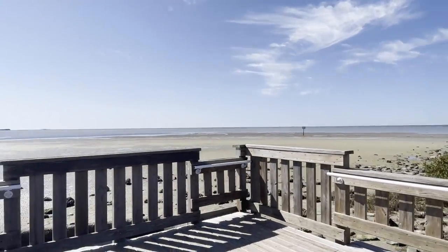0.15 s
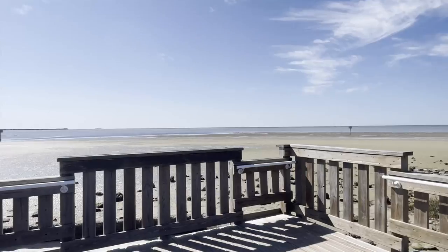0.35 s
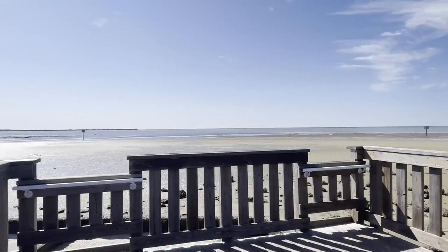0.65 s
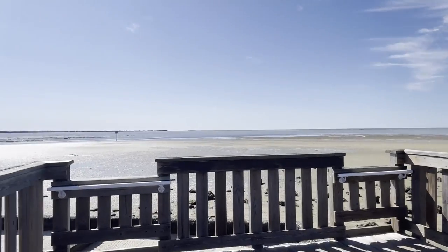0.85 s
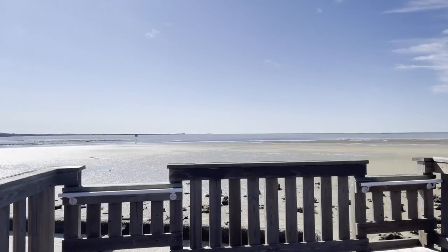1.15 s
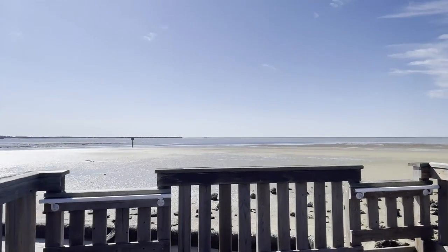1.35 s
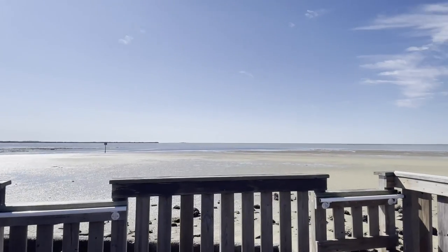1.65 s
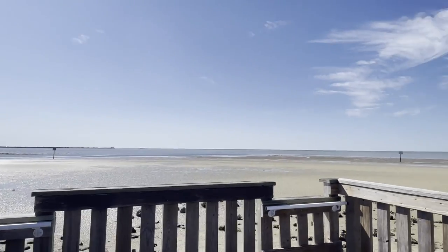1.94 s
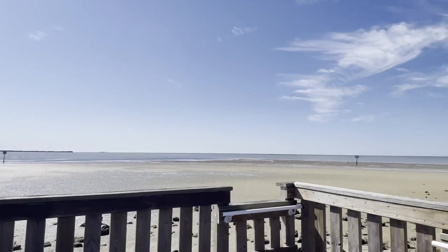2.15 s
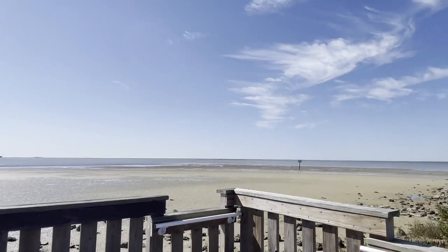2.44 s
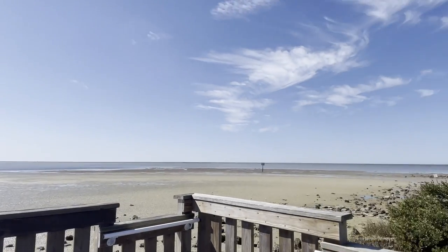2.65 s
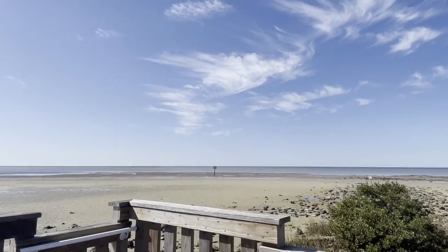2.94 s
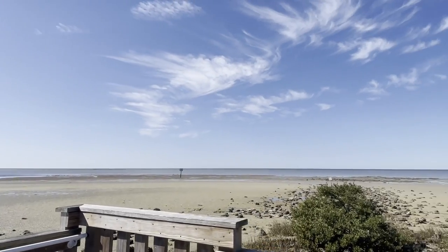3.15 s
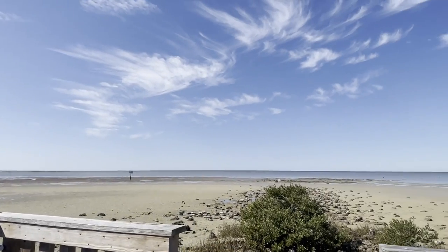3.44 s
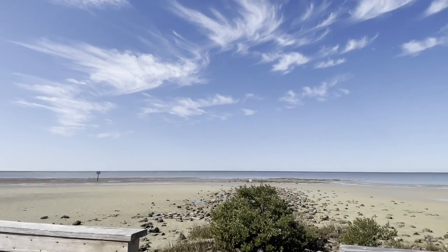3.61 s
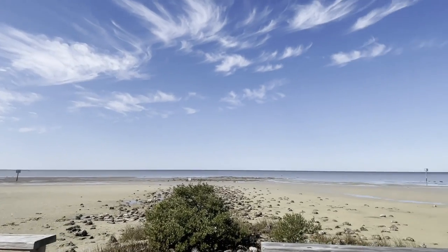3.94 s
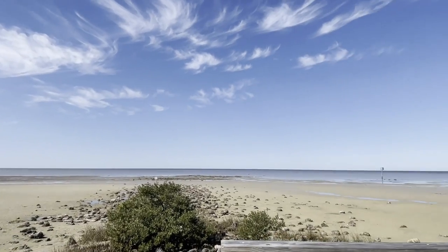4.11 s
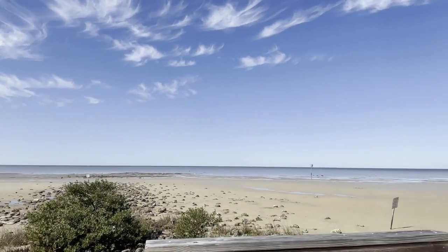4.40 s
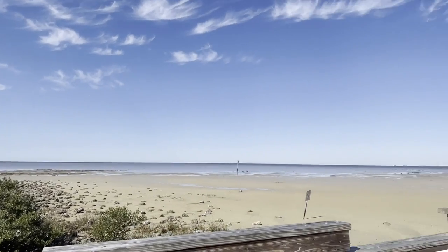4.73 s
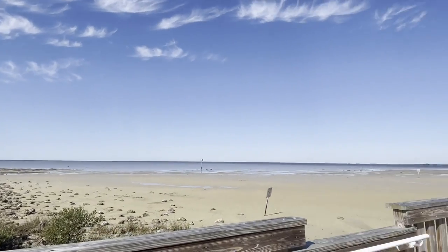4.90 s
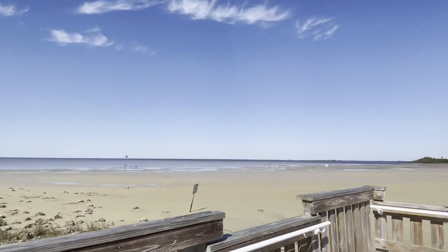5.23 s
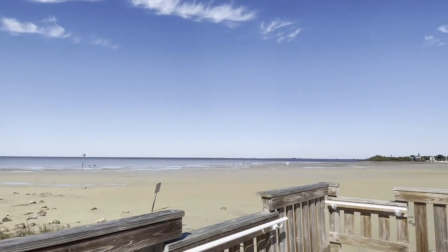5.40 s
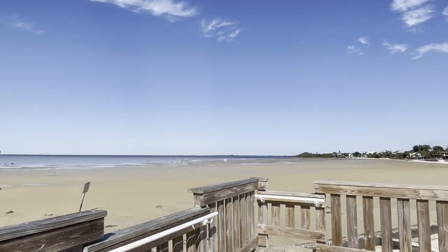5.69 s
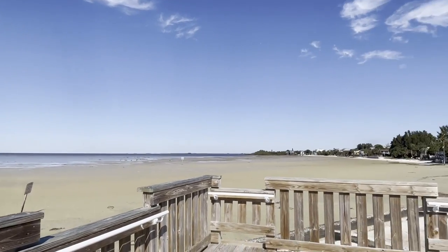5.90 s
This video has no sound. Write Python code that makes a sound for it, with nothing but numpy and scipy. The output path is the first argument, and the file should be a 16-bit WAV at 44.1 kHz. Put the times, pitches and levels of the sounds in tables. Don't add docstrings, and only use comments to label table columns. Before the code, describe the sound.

A quiet outdoor take on a wooden deck by a beach, heard only in the left channel. From 0 s low wind rumbles and flutters on the microphone, strongest until about 1.9 s, with a crackle at once and a finger tick at 0.14 s. A very faint step comes near 0.55 s, then clear hollow knocks at 1.6, 2.1, 2.5, 3.0, 3.5 and 3.9 s, each briefly ringing in the boards. Steps continue about every 0.45 s, weaker, to 5.7 s. A sharp chip sounds at 1.15 s; short falling bird whistles come at 1.8, 2.8, 3.7, 4.6 and 5.7 s, lightly echoed, with barely audible coos. Ticks cluster near 1.5 and 2.5 s. Faint shore wash and a slight insect shimmer lie behind. Wind drops after 3.7 s; dry crackles gather at 5.1-5.5 s, and a soft gust begins at 6 s.

```python
import sys
import numpy as np
from scipy import signal
from scipy.fft import next_fast_len
from scipy.io import wavfile
from scipy.ndimage import uniform_filter1d

SR = 44100
rng = np.random.default_rng(int(sys.argv[2]) if len(sys.argv) > 2 else 0)


def transcribe(signal):
    frames = np.atleast_2d(signal).T
    limited = np.clip(frames, -1, 1)
    pcm = np.round(limited * 32767).astype(np.int16)
    wavfile.write(sys.argv[1], SR, pcm)


def boost(x):
    u = np.asarray(x, float) / 20
    return 10 ** u


N = 267113

# (time [s], weight on the deck [dB], hollow boom above it [dB], plank ring above it [dB])
STEPS = [(.556, -87, -9, 2), (1.585, -65, 0.5, 2), (2.064, -62.5, 0.5, 5.5), (2.54, -66, 3, 0.5),
         (3.024, -67.5, 0.5, 9), (3.488, -64, 1, -2.5), (3.925, -75, 6.5, 4), (4.364, -73.5, 3, 5),
         (4.79, -84.5, 1.5, 1), (5.234, -80, -14, -7), (5.689, -78.5, -0.5, -6)]
# (strike [dB], hardness [dB per band], loose board clack [dB])
SOLES = [(-78.5, 4, -6), (-62, -4.5, -0.5), (-58.5, -3.5, -5.5), (-59.5, -7, -3), (-63.5, -2, 1.5),
         (-59.5, -1, 2.5), (-62.5, -.5, -10), (-68.5, 2, 1.5), (-78, -0.5, 10.5), (-80.5, 4, 11.5),
         (-67.5, -1, -14)]
# (pitch [Hz], level [dB], arrives after [s], builds in [s], t60 [s])
JOIST_MODES = [(124.6, -1.5, 0.0043, 0.0042, 0.53), (181.4, 4.5, 0.013, 0.013, 0.3),
               (207.3, -8, 0.0057, 0.021, 0.94)]
BOOM_MODES = [(184, 1.86, 0.1, 0.068, 0.73)]
BOARD_MODES = [(323, 2, 0.0067, .015, 0.37), (340, -5, 0, 0.04, 0.46), (349.6, -4, 0.022, .04, 1),
               (390.3, 0, 0, 0.042, 1)]
PLANK_MODES = [(475, -14.5, 0, 0.022, 0.98), (595.4, -10, 0, 0.011, 0.51), (620, -10, 0, 0.0073, 0.84),
               (632, -4.5, 0.054, 0.012, .45)]
# (pitch [Hz], width [Hz], level [dB])
KNOCK_RING = [(736, 36, -5), (917.5, 37, 0), (528, 97, -5.5), (900, 750, 6)]
CLACK_RING = [(1114, 46, -1.5), (1190, 11, -15), (1261, 100, 1.5), (1240, 790, 0.5)]
CLAP_RING = [(1575, 25, -6), (1714, 72, -6), (1890, 44, -10.5), (1880, 810, 6.5)]
SLAP_RING = [(3295, 290, 0.5), (3600, 420, 4.5), (3900, 220, -8)]

# (time [s], level [dB], top [Hz], end [Hz], sag [1 straight, more = early])
WHISTLES = [
    (1.812, -73.5, 4060, 3340, 1.4),
    (2.759, -67.5, 4100, 3330, 3.2),
    (3.739, -63.5, 3915, 3106, 1.63),
    (4.56, -65, 3880, 3200, 3.8),
    (5.745, -67, 3803, 3394, 2.6),
]
# (time [s], level [dB], top [Hz], end [Hz], sag [1 straight, more = early])
COOS = [
    (.15, -74.5, 742, 753, 1),
    (1.37, -81.5, 760, 698, 0.69),
    (5.59, -78, 750, 742, 1),
]
# (time [s], level [dB], start [Hz], end [Hz], length [s])
CHIPS = [
    (1.15, -56.5, 4100, 1490, 0.0078),
    (1.152, -60, 3900, 2500, 0.015),
    (1.164, -66, 3660, 2940, 0.0066),
    (5.847, -69, 3400, 3020, 0.016),
]

# (time [s], peak [dB], ring [Hz], overtone [dB], thud [dB])
TICKS = [(0.142, -47.5, 2950, -84, -50.5), (0.8714, -56, 3180, -64, -63), (1.3584, -59.5, 3680, -59.5, -91),
         (1.5357, -49.5, 4380, -49, -98), (1.548, -56, 4100, -78, -85), (2.5243, -62, 3520, -77, -83),
         (2.5418, -55.5, 3700, -62, -82), (2.5543, -52.5, 3900, -56, -55), (2.7128, -76, 4300, -79, -85),
         (4.1527, -57.5, 4270, -66, -83), (4.242, -70, 2920, -85, -90), (4.255, -75, 2600, -90, -85)]
# (time [s], peak [dB], ring [Hz])
CRACKLES = [(0.028, -45, 4160), (0.028, -60, 6200), (0.555, -56.5, 5570), (0.855, -57, 6160),
            (1.521, -53, 5860), (2.5794, -62, 5590), (3.4261, -57.5, 5600), (3.5304, -61, 6370),
            (3.5576, -59, 5850), (4.0953, -55.5, 6790), (4.1627, -54, 6060), (4.473, -58, 6200),
            (5.104, -61, 6320), (5.1262, -65, 6450), (5.1644, -69, 5910), (5.1911, -59.5, 5900),
            (5.262, -58, 6200), (5.2944, -61, 7010), (5.3048, -54.5, 6240), (5.3194, -57, 6300),
            (5.3358, -55, 6650), (5.365, -58, 6250), (5.3806, -53, 6200), (5.5004, -63.5, 6040)]

# (time [s], pressure [dB])
WIND = [(.04, -27.5), (.25, -41), (.45, -41.5), (.7, -27.5), (.96, -33.5), (1.15, -31), (1.38, -22.5),
        (1.6, -30.5), (1.84, -29), (1.97, -38), (2.1, -33), (2.6, -33), (3.0, -35.5), (3.3, -35.5),
        (3.7, -44), (4.15, -55), (5.6, -54.5), (6.06, -44)]
# (time [s], half width [s], roar [dB], buffet [dB])
EDDIES = [(.03, 0.035, -56.5, -75.5), (.11, 0.043, -60.5, -96), (.22, 0.033, -63, -84),
          (.4, 0.11, -59, -100), (.68, 0.046, -55, -91), (.8, 0.042, -61, -77.5), (1.04, 0.036, -55.5, -99),
          (1.15, 0.03, -47, -76.5), (1.22, 0.05, -54, -71), (1.29, .03, -51, -78), (1.4, 0.053, -53.5, -91),
          (1.58, 0.068, -47, -77.5), (1.7, 0.056, -57, -80), (1.84, 0.098, -58, -80.5),
          (2.23, 0.087, -63, -77), (2.54, 0.11, -63.5, -80), (2.96, 0.062, -70, -78),
          (3.3, 0.15, -64.5, -95), (3.59, 0.12, -72, -83), (4.3, 0.064, -70, -90.5), (5.87, .06, -75, -91)]
# (pitch [Hz], density [dB per Hz])
LUMP_COLOUR = [(1, -4), (3, 0.5), (8, 5), (14, -3.5), (22, -17.5), (32, -16), (45, -43), (70, -57)]
ROAR_COLOUR = [(22, -43), (36, -1.5), (60, -12), (90, -19.5), (130, -28.5), (200, -42.5)]
BUFFET_COLOUR = [(80, -39), (130, -3), (200, -6.5), (270, -8), (340, -24), (500, -43.5)]

# (time [s], half width [s], level [dB])
WAVES = [
    (1.7, 0.28, -73.5),
    (2.3, 0.24, -75),
    (3.2, 0.53, -75),
    (4.1, 0.16, -75.5),
    (5.35, 0.11, -79),
    (5.8, 0.093, -81),
]
# (time [s], half width [s], level [dB])
STIRS = [
    (0, 0.053, -76),
    (.58, .07, -84.5),
    (1.19, 0.057, -84),
    (1.47, 0.093, -87),
    (2.26, .09, -84.5),
    (2.95, 0.17, -87.5),
    (4.12, .08, -88),
    (5.32, 0.12, -81.5),
    (5.55, .12, -86.5),
]
# (time [s], half width [s], level [dB])
INSECT_SWELLS = [
    (1.75, 0.51, -78),
    (2.25, 0.14, -80),
    (2.95, 0.14, -88),
]
# (pitch [Hz], density [dB per Hz])
WASH_COLOUR = [(150, -0.5), (300, 1), (700, 3.5), (1300, -0.5), (3600, -4.5), (4200, -9), (4800, -18),
               (7000, -64)]
RUSTLE_COLOUR = [(3000, 2), (4600, -5.5), (6200, -0.5), (7500, -4.5), (9000, -11), (12000, -23)]
# (pitch [Hz], width [Hz], level [dB])
INSECT_RING = [(2340, 550, 2), (3140, 320, -4.5), (5900, 1100, -7), (7700, 12000, -8)]

CALM_DB = -55
ROAR_DB, ROAR_SHARE = -70.5, 0.16
BUFFET_DB, BUFFET_SHARE = -93, 0.33
WASH_DB, WASH_SHARE = -77.5, 0.098
RUSTLE_DB, RUSTLE_SHARE = -92.5, 0.22
NOTE_S, SCOOP_HZ, SCOOP_S = 0.118, 750, 0.011
ATTACK_DB, ATTACK_S, RELEASE_DB = -8, 0.013, -9.5
BLUR_DB, BLUR_S = 2.5, 0.005
SELF_NOISE_DB, EDGE_HZ = -88, 15720
LIVE = np.array([[2], [0]])


def evened(x):
    return x / np.sqrt(np.mean(x ** 2) + 1e-20)


def add(mix, s, sound):
    part = mix[round(s * SR):][:len(sound)]
    part += sound[:len(part)]


def along(rows):
    return np.interp(np.arange(N) / SR, *np.transpose(rows))


def humps(rows, floor_db, column=2):
    t = np.arange(0, N + 64, 64) / SR
    power = sum(boost(row[column]) ** 2 * np.exp(-((t - row[0]) / row[1]) ** 2) for row in rows)
    return np.sqrt(boost(floor_db) ** 2 + np.interp(np.arange(N) / SR, t, power))


def swell(t, builds, t60):
    t = np.maximum(t, 0)
    return (1 - np.exp(-(t / builds) ** 2)) * boost(-60 * np.maximum(t - builds, 0) / t60)


def noise(colour, patchy_db, size=1024):
    hz = np.fft.rfftfreq(size, 1 / SR)
    real, imag, patches = rng.standard_normal((4 * N // size + 5, len(hz), 3)).T
    patches = uniform_filter1d(patches, size=10, axis=0)
    patches = evened(uniform_filter1d(patches, size=10, axis=1))
    f, db = np.transpose(colour)
    colour_db = np.interp(np.log(hz + 1), np.log(f + 1), db, left=-90, right=-90)
    spectra = (real + 1j * imag) * boost(colour_db[:, None] + patchy_db * patches)
    return evened(signal.istft(spectra, nperseg=size, noverlap=size - size // 4)[1][:N])


def ringing(peaks, length, spread_db=0):
    x = rng.standard_normal(length + 2000)
    out = 0
    for (hz, width, db), luck in zip(peaks, rng.standard_normal(len(peaks))):
        pole = np.exp((2j * np.pi * hz - np.pi * width) / SR)
        y = signal.lfilter([1], np.poly([pole, pole]), x).real[2000:]
        out = out + boost(db + spread_db * luck) * evened(y)
    return evened(out)


def footfall(weight_db, boom_db, plank_db, strike_db, hardness_db, clack_db):
    deck = deck_ring(weight_db - 0.5, weight_db + boom_db, weight_db - 0.5, weight_db + plank_db)
    knock_db = strike_db
    clack_db = strike_db + clack_db + hardness_db
    clap_db = strike_db + 0.5 + 2 * hardness_db
    slap_db = strike_db - 1 + 3 * hardness_db
    return deck + sole_strike(knock_db, clack_db, clap_db, slap_db)


def deck_ring(*levels_db):
    t = np.arange(SR // 2) / SR
    out = np.zeros(len(t))
    for level_db, modes in zip(levels_db, (JOIST_MODES, BOOM_MODES, BOARD_MODES, PLANK_MODES)):
        for hz, db, after, builds, t60 in modes:
            drift = uniform_filter1d(rng.standard_normal(len(t)), size=500)
            waver = 1 + 0.3 * evened(uniform_filter1d(drift, size=500))
            tone = np.sin(2 * np.pi * (hz * t + rng.random()))
            out += boost(level_db + db + 0.5) * swell(t - after, builds, t60) * waver * tone
    return out * settle(t)


def sole_strike(*levels_db):
    t = np.arange(SR // 2) / SR
    out = np.zeros(len(t))
    rings = (KNOCK_RING, CLACK_RING, CLAP_RING, SLAP_RING)
    for db, peaks, t60 in zip(levels_db, rings, (1.0, 0.79, 0.83, 0.55)):
        out += boost(db - 7.0) * swell(t, 0.018, t60) * ringing(peaks, len(t), spread_db=3)
    return out * settle(t)


def settle(t):
    fade_out = signal.windows.tukey(2 * len(t), 0.3)[len(t):]
    return boost(-60 * np.maximum(t - 0.23, 0)) * fade_out


def birds():
    dry = np.zeros(N)
    for rows, scoop_hz in ((WHISTLES, SCOOP_HZ), (COOS, 15)):
        for s, *row in rows:
            add(dry, s, whistle(*row, scoop_hz))
    t = np.arange(SR // 2) / SR
    sparse = rng.standard_normal(len(t)) * (rng.random(len(t)) < 0.05)
    tail = sparse * swell(t - 0.006, 0.0033, 0.64)
    wet = dry + boost(-12.5) * signal.fftconvolve(dry, tail / np.linalg.norm(tail))[:N]
    for after, db in ((0.014, -9), (0.072, -20)):
        add(wet, after, boost(db) * dry[:N - SR // 5])
    for s, *row in CHIPS:
        add(wet, s, chip(*row))
    return wet


def whistle(level_db, top_hz, end_hz, sag, scoop_hz):
    t = np.arange(0, NOTE_S, 1 / SR)
    left = np.minimum((NOTE_S - t) / (NOTE_S - SCOOP_S), 1)
    scoop = scoop_hz * np.maximum(1 - t / SCOOP_S, 0) ** 1.51
    hz = end_hz + (top_hz - end_hz) * left ** sag - scoop
    luck = rng.standard_normal((2, SR // 5))
    flutter = 1 + 0.3 * evened(uniform_filter1d(luck[0], size=120))[:len(t)]
    blur_filter = np.poly([np.exp(-1 / (BLUR_S * SR))] * 2)
    blur = evened(signal.lfilter([1], blur_filter, luck[1]))[::-1][:len(t)]
    swell_db = ATTACK_DB * np.exp(-abs(t - SCOOP_S) / ATTACK_S) + RELEASE_DB * (t / NOTE_S) ** 3
    wobbling_hz = hz * (1 + 0.022 * (flutter[::-1] - 1))
    tone = np.sqrt(2) * np.sin(2 * np.pi * np.cumsum(wobbling_hz) / SR)
    loudness = boost(level_db + swell_db + BLUR_DB * blur)
    return loudness * flutter * tone * signal.windows.tukey(len(t), 0.04)


def chip(db, start_hz, end_hz, length):
    u = np.linspace(0, 1, round(length * SR))
    hz = end_hz + (start_hz - end_hz) * (1 - u) ** 1.38
    return boost(db) * np.sin(np.pi * u) * np.sin(2 * np.pi * np.cumsum(hz) / SR)


def handling():
    out = np.zeros(N)
    for s, db, hz, over_db, thud_db in TICKS:
        ring = ping(db, hz, 0.007) + ping(db - 3, 0.72 * hz, 0.009) + ping(db - 8, 0.44 * hz, 0.012)
        add(out, s, ring + ping(over_db, 6450, 0.0033) + ping(thud_db, 475, 0.018))
    t = np.arange(SR // 30) / SR
    for s, db, hz in CRACKLES:
        add(out, s, boost(db - 13 - 60 * t / 0.011) * ringing([(hz, 2200, 0)], len(t)))
    return out


def ping(db, hz, t60):
    t = np.arange(SR // 30) / SR
    return boost(db - 60 * t / t60) * np.minimum(hz * t / 0.8, 1) * np.sin(2 * np.pi * hz * t)


def wind():
    wind_db = along(WIND)
    roar = humps(EDDIES, ROAR_DB + ROAR_SHARE * (wind_db - CALM_DB))
    buffet = humps(EDDIES, BUFFET_DB + BUFFET_SHARE * (wind_db - CALM_DB), column=3)

    lumps = noise(LUMP_COLOUR, patchy_db=1, size=16384)
    envelope = abs(signal.hilbert(lumps, next_fast_len(N))[:N])
    lumps = evened(lumps / uniform_filter1d(envelope, size=4000))
    lowpass = signal.butter(2, 30, fs=SR, output="sos")
    lumps = signal.sosfiltfilt(lowpass, boost(wind_db) * lumps)
    opening = np.minimum(np.arange(N) / SR / 0.03, 1)
    lumps = lumps * np.sin(np.pi / 2 * opening) ** 2

    rush = noise(ROAR_COLOUR, patchy_db=0.5, size=8192)
    rush = evened(rush / uniform_filter1d(rush ** 2, size=4000) ** 0.073)
    flutter = noise(BUFFET_COLOUR, patchy_db=4.5, size=2048)
    return lumps + roar * rush + boost(6.0) * buffet * flutter


def puff(db, hz):
    return boost(db) * np.sin(np.pi * hz * np.arange(SR // 10) / SR) ** 2


def air():
    breeze_db = uniform_filter1d(along(WIND), size=SR // 2) - CALM_DB
    wash = humps(WAVES, WASH_DB + WASH_SHARE * breeze_db) * noise(WASH_COLOUR, patchy_db=1.75)
    leaves = noise(RUSTLE_COLOUR, patchy_db=2.0, size=256)
    rustle = humps(STIRS, RUSTLE_DB + RUSTLE_SHARE * breeze_db) * leaves
    insects = humps(INSECT_SWELLS, -100) * ringing(INSECT_RING, N)
    return wash + rustle + insects


def scene():
    mix = wind() + air() + birds() + handling()
    add(mix, 6.0, puff(-44, 9.4))
    for (s, *deck), sole in zip(STEPS, SOLES):
        add(mix, s - 0.006, footfall(*deck, *sole))
    return LIVE * mix


def band_limit(x):
    return signal.sosfilt(signal.butter(12, 16710, fs=SR, output="sos"), x)


def record(dry):
    hissed = dry + boost(SELF_NOISE_DB) * rng.standard_normal(N) * LIVE
    edge = signal.firwin(511, EDGE_HZ, window=("kaiser", 9), fs=SR)
    mix = signal.oaconvolve(hissed, edge[None], "same")
    return band_limit(mix)


dry = scene()
out = record(dry)
transcribe(out)
```